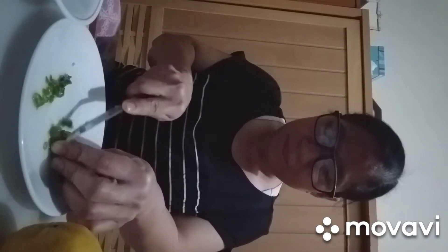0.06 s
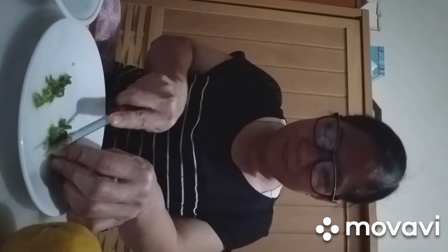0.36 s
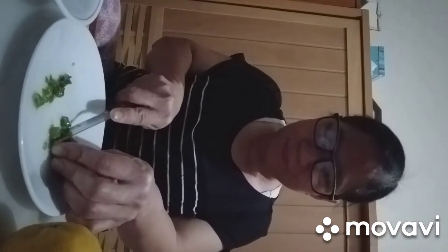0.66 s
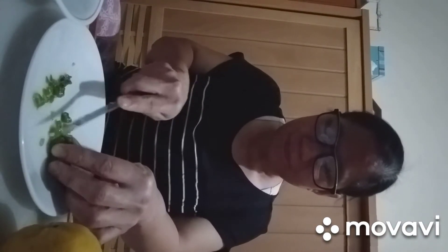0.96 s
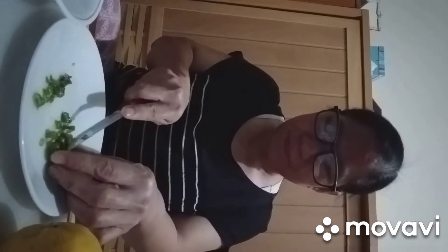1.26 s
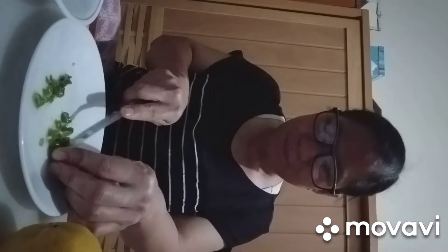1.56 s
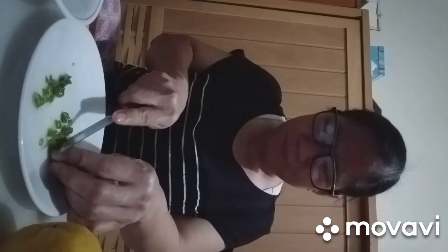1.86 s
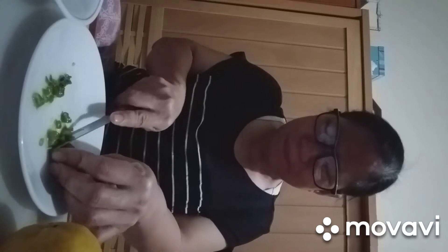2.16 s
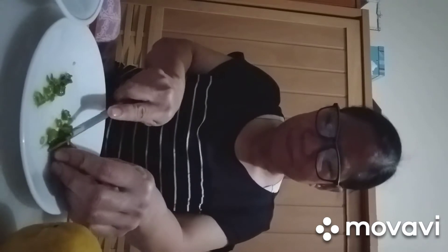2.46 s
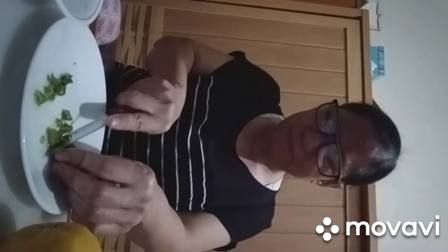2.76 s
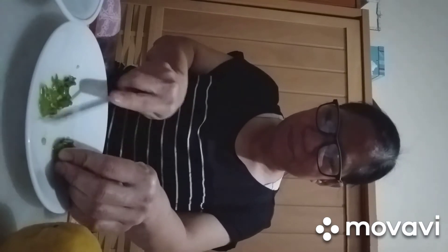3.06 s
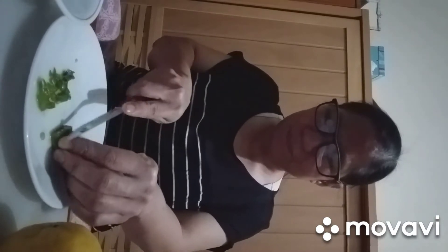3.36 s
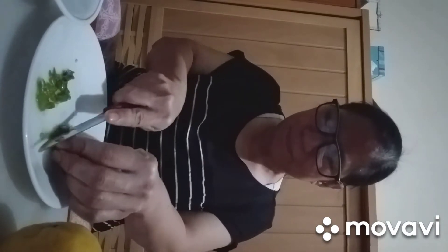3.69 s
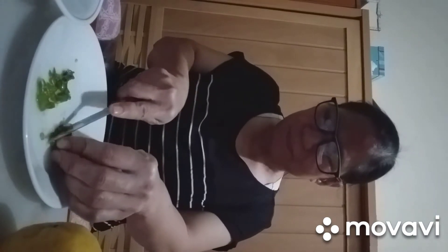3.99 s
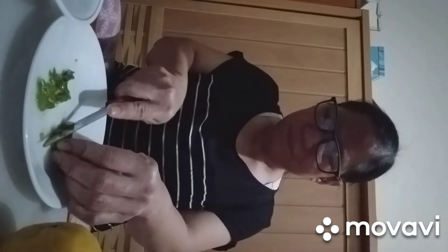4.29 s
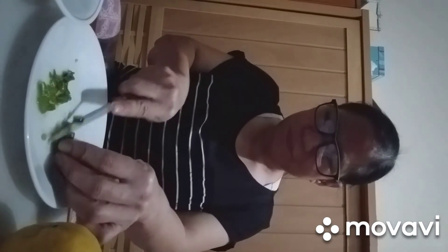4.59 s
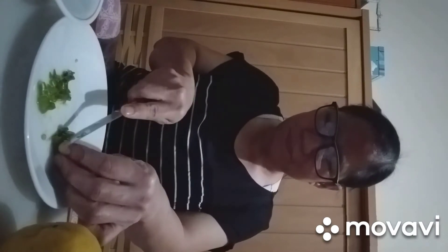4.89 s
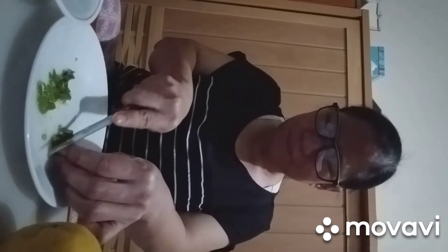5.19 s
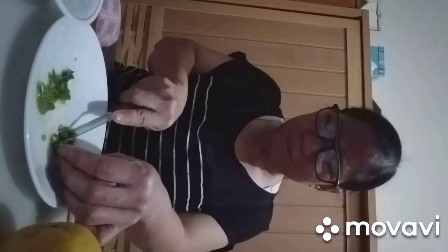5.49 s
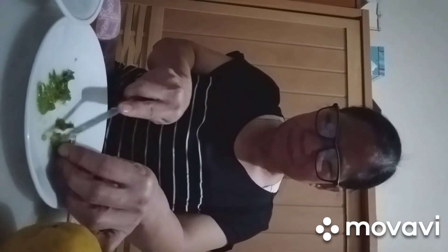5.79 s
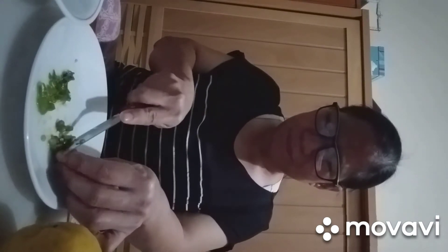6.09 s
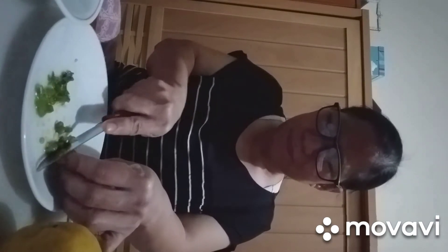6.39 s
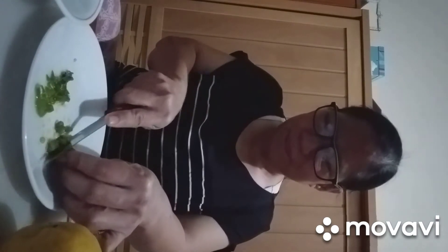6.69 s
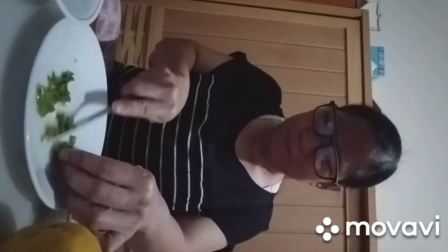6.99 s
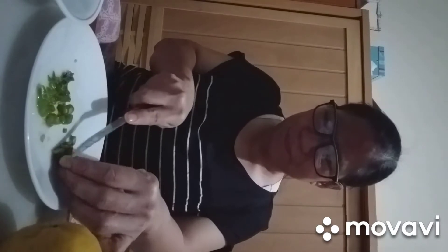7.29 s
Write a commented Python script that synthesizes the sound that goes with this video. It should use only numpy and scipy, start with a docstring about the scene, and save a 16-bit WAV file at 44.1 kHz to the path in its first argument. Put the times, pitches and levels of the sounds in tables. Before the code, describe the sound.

A small knife cuts chili on a ceramic plate, close to the microphone in a quiet room with a short echo and faint low rumble. From about 0.4 to 0.9 seconds the skin cracks and the blade saws through, with raspy scrapes and sharp clicks on the glaze. After a second of near quiet, another slice runs from 1.9 to 2.3 seconds, with dull bumps of the plate on the table. The tip gives a bright tap at 2.5 seconds, followed by soft scrapes and light ticks until 3. More slices follow at 3.6 to 4.1, 4.3 to 4.7 and 5.2 to 5.7 seconds, each a cluster of faint crackle, scraping and briefly ringing clicks over soft thumps. The last run, from 6.3 to 7 seconds, has the sharpest clacks near 6.8, and ends with a thin crack and a tiny tick.

```python
"""Slicing chili on a plate

A small knife saws through green chili on a ceramic plate, close up in a quiet room. Each slice takes
a few strokes: the edge bites, scrapes and eases off, crackling through the flesh and knocking on the
glaze. The bare tip taps the plate while pushing slices aside, the table thumps under the pressure,
and the room answers briefly."""
import sys
import numpy as np
from scipy import signal
from scipy.io import wavfile
from scipy.ndimage import map_coordinates

SR = 44100
rng = np.random.default_rng(int(sys.argv[2]) if len(sys.argv) > 2 else 0)


def wav_out(sig):
    """Save sig, one row per channel (or a flat mono array), as 16-bit PCM at SR to the path in sys.argv[1]."""
    wavfile.write(sys.argv[1], SR, np.round(np.clip(np.atleast_2d(sig).T, -1, 1) * 32767).astype(np.int16))


N = 328539
LOW_SPLIT_HZ, HIGH_SPLIT_HZ = 1400, 4200  # crossovers between lows, mids and highs


# One push or pull of the blade per row. Hiss and hollow are relative to the scrape.
# full_pressure_s, hold_s, scrape_db, hiss_db, hollow_db, rumble_db
BLADE_STROKES = [(0.0, 0.0067, -65, 5.5, 13, -45), (0.372, 0.096, -52.5, -3, 3.5, -47.5),
                 (0.578, 0.031, -40, -4.5, -2.5, -43.5), (0.757, 0.052, -44, -2, -7, -50.5),
                 (0.879, 0.068, -60, -9.5, -2.5, -85), (1.93, 0.098, -41, -7.5, -3.5, -46),
                 (2.114, .06, -40, -4.5, -8.5, -50), (2.181, 0.033, -58, -6, 11, -39.5),
                 (2.289, 0.071, -72, 6, 12, -50.5), (2.639, 0.043, -58.5, 2, -2, -53),
                 (2.679, 0.0075, -60, 2.5, 11, -40.5), (2.79, 0.036, -64.5, 2.5, 13, -46.5),
                 (2.831, 0.019, -58.5, 1.5, 14.5, -47.5), (2.913, .1, -57.5, -8.5, -1, -62.5),
                 (3.216, 0.01, -77, -7, 8, -63.5), (3.644, 0.093, -46, -6, -0.5, -47.5),
                 (3.843, 0.063, -43, -5.5, -2.5, -45.5), (4.005, .03, -55.5, -4.5, -6, -56),
                 (4.071, 0.025, -45.5, -6, -3.5, -58.5), (4.358, 0.092, -47, -7.5, -9, -53),
                 (4.491, 0.04, -51.5, -3.5, -4, -51), (4.577, 0.066, -52, -4, 0, -55),
                 (4.666, 0.047, -56, 0.5, 1, -61), (5.182, 0.058, -50, -12.5, 0, -49.5),
                 (5.243, 0.088, -43.5, -5.5, -2.5, -44.5), (5.446, 0.027, -47.5, -5, -3.5, -52),
                 (5.488, 0.019, -36, -7, -5, -46), (5.645, 0.042, -52.5, -2.5, -4.5, -53),
                 (6.312, 0.071, -40, -6, -3, -45), (6.531, .035, -36.5, -6.5, -8, -45.5),
                 (6.724, 0.049, -46, 1, -7, -45), (6.901, 0.056, -51, -7.5, 3, -45),
                 (7.018, 0.027, -60.5, -0.5, -6, -63)]

def stroke_envelopes(bite_db_per_s=595, sag_db_per_s=10.5, ease_db_per_s=328):
    """Scrape, hiss, hollow and rumble envelopes in dB: the edge bites, sags as it travels, eases off."""
    t, envelopes = np.arange(N) / SR, np.full((4, N), -120.)
    for full_s, hold_s, scrape_db, hiss_db, hollow_db, rumble_db in BLADE_STROKES:
        near = slice(*np.searchsorted(t, [full_s - .2, full_s + .4]))
        age = t[near] - full_s
        shape_db = np.minimum(bite_db_per_s * age, -sag_db_per_s * age)
        shape_db -= ease_db_per_s * np.maximum(age - hold_s, 0)
        peaks_db = [scrape_db, scrape_db + hiss_db, scrape_db + hollow_db, rumble_db]
        envelopes[:, near] = np.maximum(envelopes[:, near], np.add.outer(peaks_db, shape_db))
    return envelopes


# Plate and blade, damped by chili and hand: pitch_hz, width_hz, level_db
PLATE_MODES = [(150, 42, -5), (242, 110, -2.5), (355, 61, -2), (470, 31.3, 1.5), (601, 43, -0.5),
               (755, 120, -5.5), (1120, 230, -6.5), (1878, 225, 5.5), (2057, 150, 8.5), (3230, 550, -5),
               (3964, 150, -9), (4290, 110, -12), (4834, 150, -5), (5210, 370, -6.5), (6480, 740, -6),
               (7150, 880, -11), (7710, 140, -6.5), (8256, 170, -14), (10530, 990, -18.5),
               (13000, 5200, -29.5)]
# The plate ringing freely: pitch_hz, level_db, t60_s
PLATE_TONES = [(1957, -6, .08), (2100, 0, .07), (3115, -5, .11), (4265, -17, .14), (5626, 1, .06),
               (7170, -8, .08), (9900, -22, .05)]
# Tone curve of the scrape: frequency_hz, gain_db
SCRAPE_EQ = [(100, -10.5), (330, 6), (700, 6), (1400, -0.5), (2000, 1.5), (2600, 6), (4000, 4), (6000, 2.5),
             (8200, 1), (8900, -1), (10200, 2), (14000, -4), (15500, 3.5)]

def edge_scrape(scrape_db, hiss_db, hollow_db, slips_per_s=1000, spread_db=3, trim_db=-1, ring_db=-22):
    """The edge sticks and slips on the glaze: a train of tiny uneven blows into the plate."""
    sizes = gain_of(spread_db * np.minimum(rng.exponential(1, N), 3)) * rng.choice([-1, 1], N)
    slips = unit_rms(sizes * (rng.random(N) < slips_per_s / SR)) + 0.69 * rng.standard_normal(N)
    # as the contact point travels, it favours now one family of modes, now another
    families = [damped_body(PLATE_MODES[k::5]) * (-1) ** k for k in range(5)]
    shaken = sum(gain_of(2.5 * wander(rate_per_s=18)) * signal.oaconvolve(slips, family)[:N]
                 for family in families)
    lows, mids, highs = map(unit_rms, split_bands(equalise(shaken, SCRAPE_EQ)))
    rasp = gain_of(hollow_db) * lows + gain_of(scrape_db) * mids + gain_of(hiss_db) * highs
    ring = free_ring(PLATE_TONES)
    singing = signal.fftconvolve(slips * gain_of(scrape_db), ring / np.linalg.norm(ring))[:N]
    return gain_of(trim_db) * rasp + gain_of(ring_db) * singing


# Tone curve of every hit, snap and crack: frequency_hz, gain_db
IMPACT_EQ = [(30, -21), (100, -3), (400, 0.5), (1000, 3.5), (1400, -5.5), (2000, 1), (2600, 0), (4000, 0.5),
             (8200, 1), (8900, -17.5), (10200, -3), (16000, -10.5)]

def impacts(hits, modes, tones, crunch, crunch_s, knock_s, detune=0.075):
    """A spike and a moment of crunch excite a low knock, mid clack and high snap, over a free ring."""
    out, ring = np.zeros(N), free_ring(tones)
    bands = split_bands(equalise(damped_body(modes), IMPACT_EQ))
    t, steps = np.arange(len(ring)) / SR, np.arange(len(bands[0]))
    spike = t == 0
    for start_s, clack_db, knock_db, snap_db, ring_db in hits:
        # the blade lands on a slightly different spot each time, which shifts the damped modes
        speed = 1 + detune * rng.uniform(-1, 1)
        lows, mids, highs = (map_coordinates(band, [steps * speed]) for band in bands)
        grit = crunch * rng.standard_normal(len(t))
        force = spike + grit * np.exp(-t / crunch_s)
        push = spike + .5 * grit * np.exp(-t / knock_s)  # the hand's weight follows more slowly
        knock = gain_of(knock_db) * unit_rms(signal.fftconvolve(push, lows), size=530)
        clack = unit_rms(signal.fftconvolve(force, mids), size=265)
        snap = gain_of(snap_db) * unit_rms(signal.fftconvolve(force, highs), size=265)
        hit = (knock + clack + snap)[:len(t)] + gain_of(ring_db) * ring
        add(out, start_s, gain_of(clack_db) * hit)
    return out


# Hard hits of the edge on the plate. Knock, snap and ring are relative to the clack.
# start_s, clack_db, knock_db, snap_db, ring_db
CUT_HITS = [(0.355, -44.5, -4.5, -7, -24), (0.3884, -37.5, -3.5, -8, -41), (0.4035, -36, -9, -6, -23),
            (0.418, -39, -2.5, -10, -31), (0.4468, -37, -2, -8.5, -20.5), (0.5551, -44, -16, -7, -24),
            (0.5688, -42, 0, -7, -30), (0.7223, -45, -14, -7, -29), (0.7522, -33.5, -12, 3.5, -12),
            (1.9091, -39, -11, -10, -31), (1.921, -47.5, 7, -6, 3), (1.9533, -36, -14, -5, -19),
            (2.0026, -30.5, -5.5, -9, -26), (2.0127, -31, -11, -6, -26.5), (2.15, -38.5, -7, 1, -6),
            (3.6105, -51, -17, -21, -22), (3.6391, -43.5, -17, -11, -6), (3.6964, -38, -8, -24, -26),
            (3.7301, -36.5, -7, -16, -33), (4.3143, -43, -13.5, -12, -19), (4.3316, -40.5, -0.5, -1, -40.5),
            (4.4175, -50, -1, 6, -18.5), (4.4423, -28.5, -10.5, -4.5, -7.5), (4.4987, -40, -8.5, -4, -28.5),
            (5.1715, -41, -7, -26, -30), (5.1919, -45.5, -14.5, -5.5, -35), (5.2261, -42, -6, -3.5, -15.5),
            (5.251, -38, -0.5, -2.5, -29), (5.2742, -32, -6.5, -5, -18), (5.3437, -36, -12, -5, -3),
            (5.5257, -29, -11, -12, -5.5), (6.2733, -48.5, -6, -5.5, -24), (6.3025, -36, -12.5, -8, -19),
            (6.311, -33.5, -12, -30, -28), (6.318, -34.5, -3, -14, -18), (6.3988, -33, -9, 0.5, -0.5),
            (6.724, -32, -18, -1.5, -17.5), (6.8077, -26.5, -15, -7.5, -11), (6.8206, -32, -5.5, 5.5, 2)]

def blade_cuts():
    """The blade breaks through the chili and strikes the plate."""
    return impacts(CUT_HITS, PLATE_MODES, PLATE_TONES, crunch=0.39, crunch_s=0.001, knock_s=0.0054)


# The first stroke of a slice tearing through the skin: start_s, length_s, level_db
SKIN_TEARS = [(0.41, .04, -48), (1.925, .075, -45), (3.62, .11, -49), (4.36, .07, -52), (5.185, .15, -55),
              (6.32, .06, -49.5)]

def fibre_crackle(snaps_per_s=80, unevenness=0.38, spread_db=5, treble_db=3, ring_db=-16):
    """Fibre after fibre gives way to the edge: a loosely regular run of small blows into the plate."""
    t = np.arange(N) / SR
    gate = sum(gain_of(level_db) * (t > start_s) * (t < start_s + length_s)
               for start_s, length_s, level_db in SKIN_TEARS)
    snap_rate = snaps_per_s * np.exp(unevenness * wander(snaps_per_s))
    fibres_cut = np.floor(np.cumsum(snap_rate) / SR)
    snaps = unit_rms(np.diff(fibres_cut, prepend=0) * gain_of(spread_db * rng.standard_normal(N)))
    ring = free_ring(PLATE_TONES)
    lows, mids, highs = split_bands(equalise(damped_body(PLATE_MODES, size=len(ring)), IMPACT_EQ))
    clack = unit_rms(lows + mids + gain_of(treble_db) * highs) + gain_of(ring_db) * unit_rms(ring)
    return signal.oaconvolve(snaps * gate, clack / np.linalg.norm(clack))[:N]


# Taps of the tip. Knock, snap and ring are relative to the clack.
# start_s, clack_db, knock_db, snap_db, ring_db
TIP_HITS = [(2.5346, -29, -16.5, 4, -13.5), (2.8319, -59, -10, 10, -33), (2.974, -48.5, -4.5, 1, -32),
            (2.9889, -56.5, 3, 7.5, -27), (3.0003, -54.5, -6, 7.5, -21.5), (3.0225, -43, -33, -2.5, -21),
            (3.0365, -50.5, -30, 4, -15), (4.7055, -74, -10, 22, -22), (4.7133, -52, -33, 15.5, -27.5),
            (4.731, -51, -20, -18, -13), (7.1925, -71, -20, 5, -14)]
# The light, stiff knife tip: pitch_hz, width_hz, level_db
TIP_MODES = [(500, 200, -8), (900, 300, -14), (1960, 220, -3), (2750, 400, -8), (3400, 400, -5),
             (4700, 350, 1), (5250, 400, -1), (6150, 500, 0), (6950, 280, -1), (7900, 350, -11),
             (10350, 450, -13), (13500, 3500, -24)]
# The blade ringing freely: pitch_hz, level_db, t60_s
BLADE_TONES = [(3390, 5, .15), (4550, -15, .09), (5300, -3, .07), (6850, -1, .1), (9750, -16, .1)]

def tip_taps():
    """The bare tip clicks on the glaze and sets the blade ringing."""
    return impacts(TIP_HITS, TIP_MODES, BLADE_TONES, crunch=.28, crunch_s=.0013, knock_s=.003)


# Thin, sharp cracks of the chili skin: start_s, level_db, low_hz, high_hz
SKIN_CRACKS = [(0.3662, -33, 2490, 8700), (1.5345, -60.5, 7950, 15000), (4.4968, -43, 4030, 13000),
               (5.0065, -61, 1164, 5870), (6.4007, -44, 3970, 13000), (7.0527, -43.5, 3200, 14400)]

def skin_cracks(decay_s=0.000083):
    """The taut skin cracks in a fraction of a millisecond, too quickly to move the plate."""
    out, t = np.zeros(N), np.arange(SR // 100) / SR
    for start_s, level_db, low_hz, high_hz in SKIN_CRACKS:
        burst = rng.standard_normal(len(t)) * np.exp(-t / decay_s)
        crack = equalise(filtered(burst, [low_hz, high_hz], "band", order=2), IMPACT_EQ)
        add(out, start_s, gain_of(level_db) * unit_rms(crack, size=150))
    return out


# Dull bumps of the plate on the table: start_s, peak_db, pitch_hz
PLATE_BUMPS = [(0.575, -42.5, 168), (0.762, -37, 234), (1.939, -37.5, 150), (2.011, -31.5, 154),
               (2.18, -34.5, 242), (2.297, -37, 140), (2.682, -48, 324), (2.83, -39.5, 220),
               (3.846, -55, 354), (4.333, -36, 470), (4.592, -40.5, 236), (5.252, -44, 260),
               (5.625, -45, 248), (6.555, -39.5, 157), (6.692, -42.5, 225), (6.918, -34, 225)]

def plate_thuds(rise_s=0.0022, t60_s=0.089):
    """The blade bears down and sets the plate rocking for a few cycles."""
    out, t = np.zeros(N), np.arange(SR // 4) / SR
    swell = (1 - np.exp(-t / rise_s)) * gain_of(-60 * t / t60_s)
    for start_s, peak_db, pitch_hz in PLATE_BUMPS:
        add(out, start_s, gain_of(peak_db) * swell / swell.max() * np.sin(2 * np.pi * pitch_hz * t))
    return out


# Resonances of the table top: pitch_hz, width_hz, level_db
TABLE_MODES = [(80, 26, 4.5), (157, 27, 5), (225, 29, 3.5), (289, 26, -3.5), (329, 18, -6.5), (470, 29, -1),
               (607, 63, -33.5)]

def table_rumble(rumble_db, bumps_per_s=200):
    """The blade's judder passes through the plate into the table as soft, low bumps."""
    bumps = rng.choice([-1, 1], N) * (rng.random(N) < bumps_per_s / SR)
    judder = unit_rms(bumps) + 0.35 * rng.standard_normal(N)
    shaken = signal.fftconvolve(judder, damped_body(TABLE_MODES))[:N]
    return gain_of(rumble_db) * unit_rms(filtered(shaken, [50, 700], "band"))


# Decay of the room's tail: frequency_hz, t60_s
ROOM_DECAY = [(100, 0.16), (400, 0.23), (1500, 0.23), (3500, 0.33), (7000, 0.15), (12000, 0.27)]
# Early reflections: delay_s, gain
ROOM_ECHOES = [(.0031, 0.17), (.0068, -.1), (0.0148, .12), (.0162, -.15), (.0232, .12)]

def room_reverb(x, tail_db=-7, build_s=0.013, reflections_per_s=3000):
    """A few near echoes, then a short tail whose bands die at their own speed."""
    reflections = rng.standard_normal(SR // 2) * (rng.random(SR // 2) < reflections_per_s / SR)
    hz, t, spectrum = signal.stft(reflections, SR, nperseg=256)
    decay = gain_of(-60 * t / curve_at(ROOM_DECAY, hz)[:, None])
    tail = signal.istft(spectrum * decay, SR, nperseg=256)[1]
    tail *= np.minimum(np.arange(len(tail)) / SR / build_s, 1) ** 2
    response = gain_of(tail_db) * tail / np.linalg.norm(tail)
    for delay_s, gain in ROOM_ECHOES:
        response[round(delay_s * SR)] += gain
    return signal.fftconvolve(x, response)[:N]


# Tone curve of the background noise: frequency_hz, gain_db
ROOM_TONE_EQ = [(15, -56), (42, -16.5), (64, -2.5), (80, -8.5), (98, 2.5), (125, -13.5), (190, -15),
                (270, -23.5), (550, -28.5), (1500, -33), (4500, -35), (9000, -41.5), (13000, -37),
                (16000, -33)]

def room_tone(level_db=-66):
    """Low rumble of the house and faint microphone hiss."""
    return gain_of(level_db) * unit_rms(equalise(rng.standard_normal(N), ROOM_TONE_EQ))


def damped_body(modes, size=4096):
    """A damped object's answer to one tiny blow; neighbouring modes move in opposite directions."""
    t = np.arange(size) / SR
    return sum((-1) ** k * gain_of(db) * width * np.exp(-np.pi * width * t) * np.cos(2 * np.pi * hz * t)
               for k, (hz, width, db) in enumerate(modes))


def free_ring(tones):
    """The longer tones of an object left free to ring."""
    t = np.arange(SR // 5) / SR
    return sum(gain_of(db - 60 * t / t60_s) * np.sin(2 * np.pi * hz * t) for hz, db, t60_s in tones)


def equalise(x, curve, size=8192):
    """Minimum-phase filter that follows a tone curve."""
    log_gain = np.log(gain_of(curve_at(curve, abs(np.fft.fftfreq(size, 1 / SR)))))
    response = np.fft.ifft(np.exp(signal.hilbert(log_gain).conj())).real
    return signal.fftconvolve(x, response[:size // 2])[:len(x)]


def filtered(x, hz, kind, order=3):
    """Low-, band- or high-pass filter."""
    return signal.sosfilt(signal.butter(order, hz, kind, fs=SR, output="sos"), x)


def split_bands(x):
    """Splits a sound into lows, mids and highs."""
    bands = (LOW_SPLIT_HZ, "low"), ([LOW_SPLIT_HZ, HIGH_SPLIT_HZ], "band"), (HIGH_SPLIT_HZ, "high")
    return [filtered(x, hz, kind) for hz, kind in bands]


def curve_at(curve, hz):
    """Reads a curve on a log-frequency axis."""
    points_hz, values = np.transpose(curve)
    return np.interp(np.log(hz + 1), np.log(points_hz + 1), values)


def wander(rate_per_s, size=1000):
    """A random curve gliding between values of about unit size."""
    return np.interp(np.arange(N) / SR * rate_per_s, np.arange(size), rng.standard_normal(size))


def gain_of(db):
    """Decibels to amplitude."""
    return 10 ** (np.asarray(db) / 20)


def unit_rms(x, size=None):
    """Scales to unit rms over the first size samples, or over all of them."""
    return x / np.sqrt(np.mean(x[:size] ** 2) + 1e-20)


def add(mix, start_s, sound):
    """Mixes a sound in at its start time."""
    part = mix[round(start_s * SR):][:len(sound)]
    part += sound[:len(part)]


def scene():
    """Knife, chili, plate and table in the room, in mono."""
    wobble_db = 2.23 * wander(rate_per_s=35)  # the hand's pressure wobbles
    scrape_db, hiss_db, hollow_db, rumble_db = stroke_envelopes() + wobble_db
    sawing = edge_scrape(scrape_db, hiss_db, hollow_db) + fibre_crackle()
    bed = table_rumble(rumble_db) + plate_thuds() + room_tone()
    cuts, taps, cracks = blade_cuts(), tip_taps(), skin_cracks()
    reverb_send = gain_of(-3.5) * (sawing + cuts) + gain_of(0.5) * taps + gain_of(-11) * cracks
    return (sawing + cuts + taps + cracks + bed + room_reverb(reverb_send))[None]


def record(dry):
    """A steep low-pass takes off the very top of the treble."""
    low_pass = signal.firwin(511, cutoff=15950, window=("kaiser", 9), fs=SR)
    return signal.oaconvolve(dry, low_pass[None], "same")


dry = scene()
out = record(dry)
wav_out(out)
```